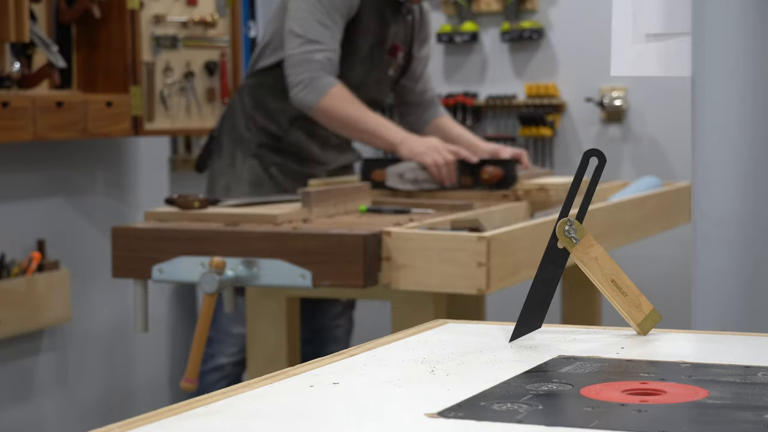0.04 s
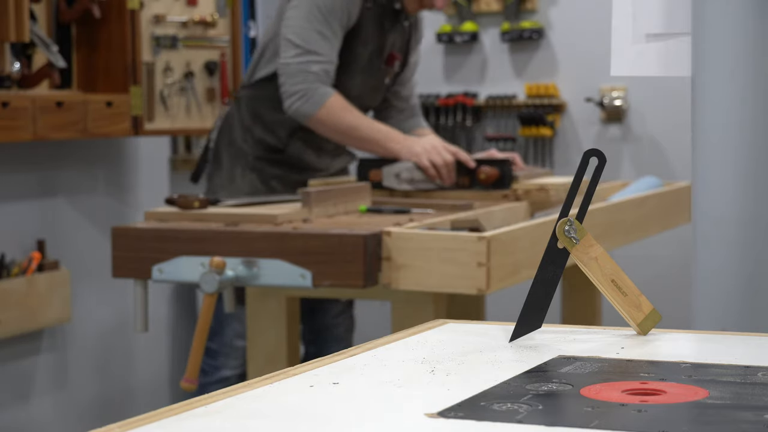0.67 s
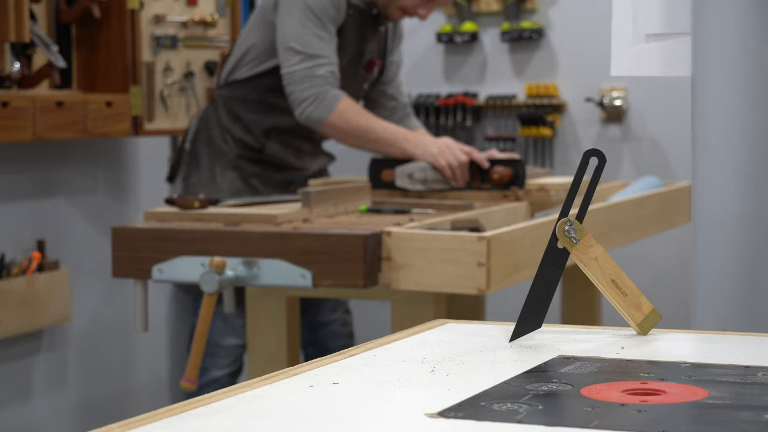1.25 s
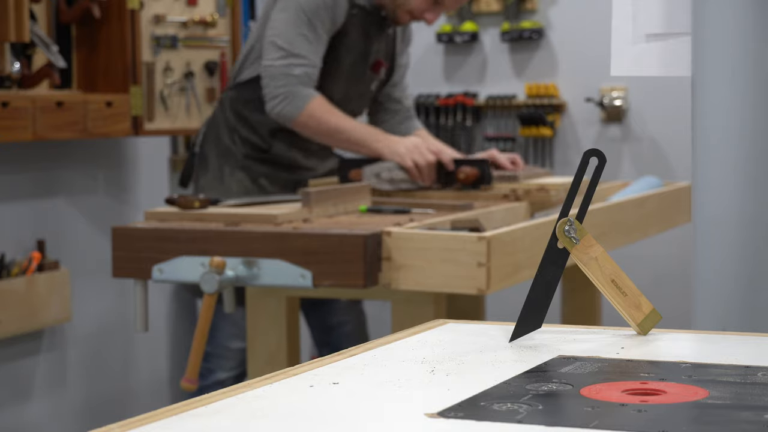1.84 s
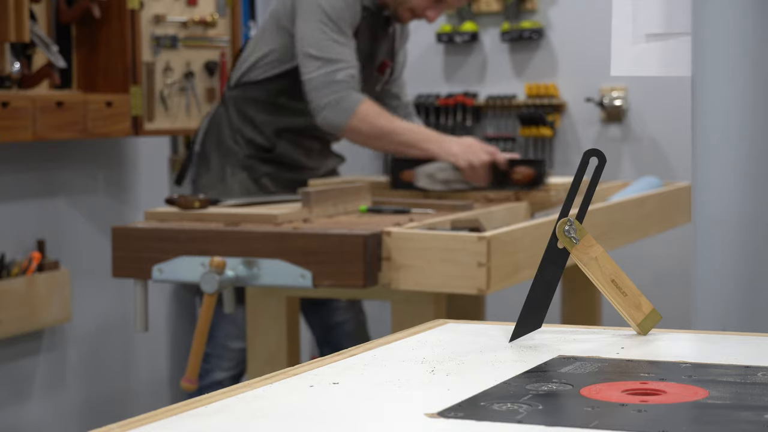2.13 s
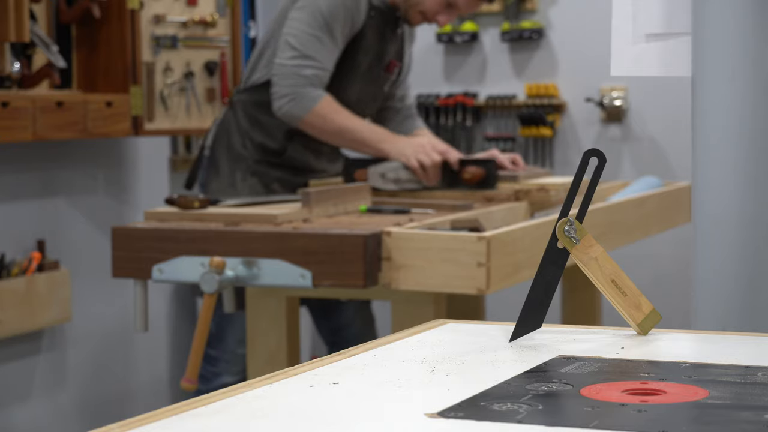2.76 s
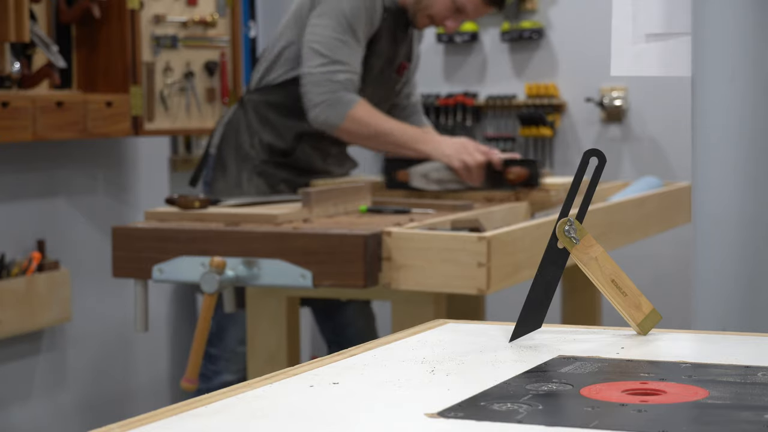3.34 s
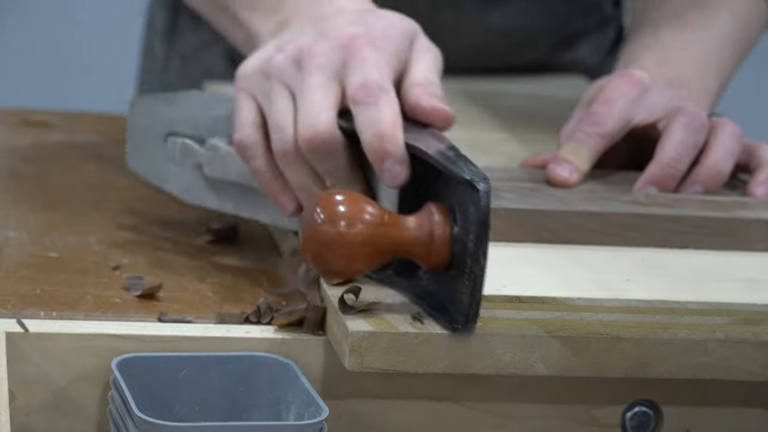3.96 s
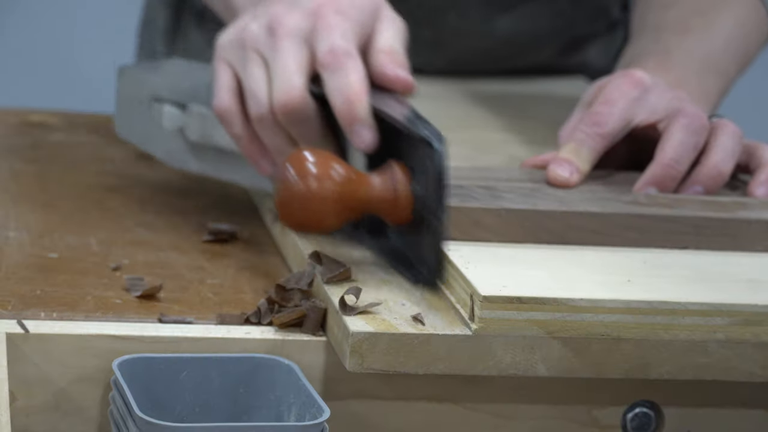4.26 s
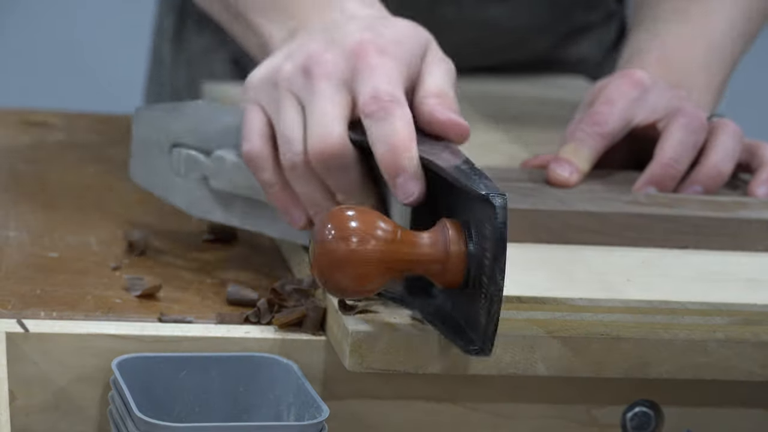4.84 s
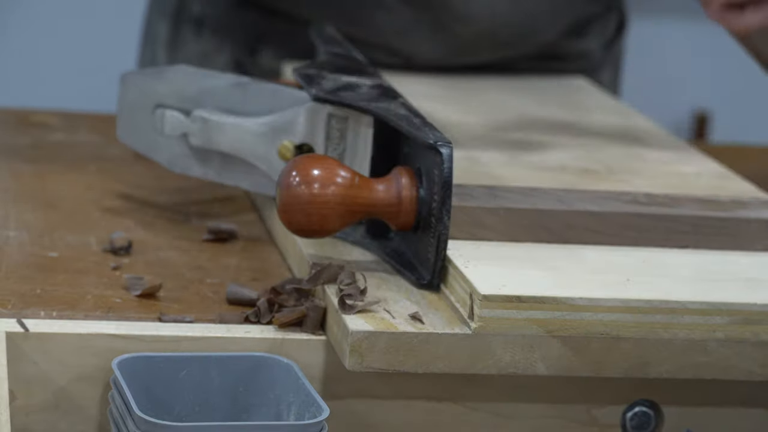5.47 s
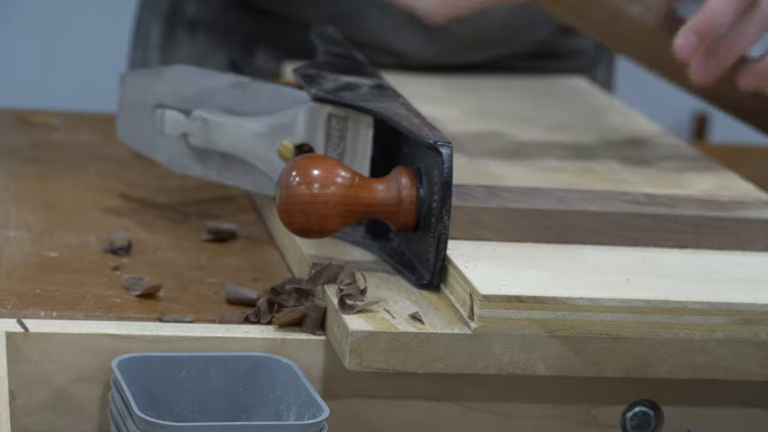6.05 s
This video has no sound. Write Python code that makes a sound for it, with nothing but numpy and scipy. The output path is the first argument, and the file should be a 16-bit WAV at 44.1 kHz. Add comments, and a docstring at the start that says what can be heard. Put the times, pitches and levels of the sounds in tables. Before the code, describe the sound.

An iron hand plane works the end of a board, each push a short rasp ending in a hard knock, each return a lighter clack. The strokes are first heard from across a small, live workshop, after a few faint taps and slides. The microphone then moves close for three louder strokes that thud through the bench. The plane slides to rest, and a single wooden knock and soft hand rubbing follow.

```python
"""Hand plane on a shooting board

An iron plane runs back and forth on its side in a small, live workshop. Its sole rasps on the wood, the blade
bangs into the end grain on each push, and the plane clacks on the way back. Heard from across the room, then
close by; at last the workpiece is knocked as it is set down, then rubbed."""
import sys
import numpy as np
from scipy import signal
from scipy.fft import rfft, irfft
from scipy.io import wavfile

SR = 44100
rng = np.random.default_rng(int(sys.argv[2]) if len(sys.argv) > 2 else 0)


def dump(signal):
    """Clip the signal to [-1, 1] and save it as 16-bit WAV at the path in sys.argv[1]."""
    limited = np.clip(np.atleast_2d(signal).T, -1, 1)
    pcm = np.round(limited * 32767).astype(np.int16)
    wavfile.write(sys.argv[1], SR, pcm)


N = 269010
BLOW_SAMPLES = SR  # one blow with its echoes

# far blows: (time [s], gain [dB], weight [dB], brightness [dB], iron ring [dB], blade pitch [Hz],
# low board ring [dB], high board ring [dB])
FAR_PUSHES = [(0.791, -40.3, 2, -2.5, -4.5, 4420, -17, 2.5), (1.991, -28, 5.5, 3, 1, 4295, -3, -29),
              (2.46, -32, -5, 0.5, -5, 4244, 0.5, -0.5), (2.943, -36.5, 2, -2.5, -3.5, 4295, -3, -27),
              (3.371, -36.5, 0, 0, 0, 4430, -17.5, 2.5)]
FAR_RETURNS = [(1.661, -60.5, 9, 0, -1, 4280, 3, -14.5), (2.2476, -36.5, -4, -0.35, -9, 4270, -5, -13),
               (2.745, -38.5, -2, -.5, -4.5, 4300, -23, -9), (3.224, -36, -9, 0.29, -8, 4350, 1, -0.5)]
# close pushes: (time [s], gain [dB], bench thud [dB])
NEAR_PUSHES = [(3.878, -21.5, 8), (4.3148, -21.5, 6), (4.7575, -21, 0.5)]
# close returns: (time [s], gain [dB], plane ring [dB])
NEAR_RETURNS = [(3.6925, -30, -27), (4.158, -31, -20.5), (4.5873, -31.5, -11)]
# workpiece set down: (time [s], gain [dB], build-up [s])
TAPS = [(0.129, -61, 0.031), (0.239, -45, 0.0091)]
# workpiece slid to the fence: (time [s], gain [dB], length [s])
SWISHES = [(1.135, -60.5, 0.031), (1.28, -50.5, 0.037)]
# bumps as the plane is shifted: (time [s], level [dB])
SHIFTS = [(1.85, -59), (2.206, -55), (3.557, -64), (3.664, -52.5)]
# slow plane slides, hand rubs: (peak time [s], level [dB], rise [s], fall [s])
SLIDES = [(0.08, -66, .3, .3), (0.62, -72.5, 0.33, 0.22), (1.74, -61.5, 0.12, 0.18), (4.92, -70, .1, 0.14),
          (5.1, -59, 0.04, 0.038), (5.2, -66, 0.12, 0.14)]
RUBS = [(5.42, -59, 0.13, .23), (5.93, -64, 0.13, 0.14)]

# modes: (frequency [Hz], width [Hz], gain [dB])
BENCH_MODES = [(155, 18, 2), (215, 16, 4), (274, 14, 9), (329, 14, 8), (392, 20, 6), (482, 20, 2),
               (524, 12, 8), (599, 16, 1), (751, 18, 7)]
BOARD_MODES = [(891, 10, 11), (1214, 4, 15), (1445, 14, 9), (1597, 5.5, 14)]
IRON_MODES = [(1310, 16, 0), (2050, 100, -2), (2698, 24, 14), (2750, 40, 12), (2820, 24, 15), (3440, 80, 2),
              (5050, 40, 3), (5830, 50, 17), (5970, 60, 16), (7460, 60, 5), (9100, 70, 12), (14400, 400, 7)]
BLOW_MODES = [(464, 47, -6.5), (853, 100, -5), (1410, 56, -13.5), (1624, 110, -3), (1880, 124, 2.5),
              (2425, 100, -3), (3454, 115, 6.5), (3670, 58, -14), (5600, 240, -33.5), (6800, 190, -29),
              (10600, 3200, -32.5), (13440, 820, -22)]
PLANE_MODES = [(1882, 30, 3), (1971, 30, 0), (3520, 45, 5), (3610, 60, 2), (5490, 60, 3), (5570, 60, 2),
               (7337, 150, -10)]
WORKPIECE_MODES = [(218, 17, -9), (430, 16, -18), (529, 24, 5.5), (713, 18, -3.5), (893, 41, -10.5),
                   (1409, 40, 6), (1650, 120, -37), (2597, 59, -5.5), (3100, 150, -16.5), (4080, 68, -10),
                   (5740, 49, -11.5), (7240, 100, -19), (9010, 150, -37.5)]
# blade modes, pitched by its seating in the wood: (offset [Hz], width [Hz], gain [dB])
BLADE_MODES = [(-75, 28, 19), (0, 28, 18), (85, 28, 17)]

# edges between the five far-knock bands: (frequency [Hz])
BAND_EDGES_HZ = [350, 700, 1800, 5000]
# knock balance per band, bass first: (gain [dB])
PUSH_BANDS_DB = [-7.5, -2.5, 0.5, -0.5, -14]
RETURN_BANDS_DB = [-12, -5.5, -2, -4, -23]
TAP_BANDS_DB = [-24.5, -15, 0, -12, -41]
# a blow's weight and brightness per band: (share [0-1])
WEIGHT_SHARE = [1, .8, 0, 0, 0]
BRIGHT_SHARE = [0, 0, 0, 1, 0]

# spectra of contacts, bench, friction and air: (frequency [Hz], gain [dB])
WOOD_EQ = [(30, -47), (60, -27), (110, -26), (180, -13.5), (240, -4.5), (450, 3.5), (900, -0.5), (1500, 0),
           (2400, -6), (3300, -5.5), (4400, -16), (6000, -26.5), (10000, -33), (15500, -40)]
CRACK_EQ = [(100, -7), (500, 8), (1500, 2.5), (3500, 13.5), (4400, -19), (7500, -11), (10000, -33.5),
            (14500, -21.5), (16000, -35.5)]
THUD_EQ = [(40, -32.5), (90, -34.5), (140, -0.5), (180, -18), (300, -0.5), (450, 3), (800, -1), (1300, -2),
           (2500, -2.5), (5000, -11), (15000, -36.5)]
BUMP_EQ = [(40, -22), (90, -8.5), (150, -3), (220, -3.5), (400, 0), (700, -3.5), (1200, -15.5),
           (4000, -50.5), (15000, -62)]
NEAR_BOOM_EQ = [(25, -26), (45, -19), (90, -25.5), (140, 10), (200, -11.5), (400, -44), (2000, -70.5)]
FAR_BOOM_EQ = [(25, -21.5), (45, -8.5), (70, -2.5), (135, 2.5), (200, -10.5), (400, -34.5), (2000, -68.5)]
RASP_EQ = [(60, -21), (200, -3.5), (400, -3.5), (900, 4), (1500, -5), (2400, -1), (3500, -0.5),
           (4800, -9.5), (7000, -15), (10000, -23), (15500, -23.5)]
SWISH_EQ = [(100, -20), (300, -15), (450, 10), (800, -0.5), (1600, 2), (2900, 8), (4300, 5.5), (6000, -0.5),
            (10000, -6.5), (15500, -15)]
SKIN_EQ = [(100, 7), (500, -6.5), (1400, -9), (2600, 6.5), (4200, 4), (7000, -5.5), (10000, -9),
           (15500, -10)]
MID_AIR_EQ = [(20, 3.5), (50, 1), (110, -2), (280, 1.5), (550, -6.5), (1200, -7.5), (3300, -20),
              (6000, -16.5), (15500, -20)]
SIDE_AIR_EQ = [(12, -30), (20, 1), (76, 0.5), (245, -29.5), (958, -39), (10800, -37), (15500, -14.5)]
# shop reverberation: (frequency [Hz], T60 [s])
SHOP_T60 = [(100, 0.25), (260, 0.64), (700, 0.48), (1840, 0.42), (4850, 0.43), (12800, 0.23)]


def near_strokes(scrape_s=.012, rock_s=.085, groan_lead_s=.025):
    """Close by: ringing pushes, scraping return clacks; the plane rocks after each."""
    out = np.zeros(N)
    for at_s, db, thud_db in NEAR_PUSHES:
        blow = near_blow(db, scrape_s, thud_db, scrape_db=-38, room_db=-15.16, ring_db=-5)
        add(out, at_s - scrape_s, blow)
        add(out, at_s, boom(NEAR_BOOM_EQ, db=-59.5))
        add(out, at_s + rock_s, bump(db=-55))
    for at_s, db, ring_db in NEAR_RETURNS:
        blow = near_blow(db, scrape_s, thud_db=10, scrape_db=-10, room_db=-16.2, ring_db=ring_db)
        add(out, at_s - scrape_s, blow)
        add(out, at_s + rock_s, bump(db=-52))
        add(out, at_s + rock_s - groan_lead_s, groan())
    return out


def near_blow(db, scrape_s, thud_db, scrape_db, room_db, ring_db):
    """A swelling scrape, then hard contact rings the hand-damped plane; bench and room follow."""
    push = contact(cutoff_hz=3750, crush_db=-10.5, crush_s=.0077)
    crack = level(colour(burst(.015), CRACK_EQ), -8.5, over_s=.02)
    direct = level(resonate(push, BLOW_MODES), 0, over_s=.02) + crack
    ring = level(resonate(push, PLANE_MODES), ring_db, over_s=.02)
    tail = level(in_shop(direct + ring, build_s=.0056), room_db, over_s=.08)
    thud = level(bench_thud(THUD_EQ), thud_db - 24, over_s=.08)
    lead = int(scrape_s * SR)
    ramp = np.interp(np.arange(BLOW_SAMPLES), [0, lead], [.4, 1], right=0)
    rubbing = colour(rng.standard_normal(BLOW_SAMPLES) * ramp, CRACK_EQ)
    scrape = level(resonate(rubbing, BLOW_MODES) + undb(-19) * rubbing, scrape_db, over_s=scrape_s)
    hit = np.pad(direct + tail + thud, (lead, 0))[:BLOW_SAMPLES]
    return undb(db) * (scrape + hit)


def far_strokes(push_build_s=.012, return_build_s=.0095):
    """Across the room: the workpiece is set down, then the plane goes back and forth."""
    out = np.zeros(N)
    for at_s, db, build_s in TAPS:
        bands_db = db + np.array(TAP_BANDS_DB)
        tap = far_knock(bands_db, build_s, iron_db=-3, blade_hz=4310, board_db=[1, 1, -16, -9])
        add(out, at_s, tap)
    kinds = (FAR_PUSHES, PUSH_BANDS_DB, push_build_s), (FAR_RETURNS, RETURN_BANDS_DB, return_build_s)
    for blows, balance_db, build_s in kinds:
        for at_s, db, weight_db, bright_db, iron_db, blade_hz, low_db, high_db in blows:
            tone_db = weight_db * np.array(WEIGHT_SHARE) + bright_db * np.array(BRIGHT_SHARE)
            bands_db = db + tone_db + balance_db
            board_db = [low_db, low_db - 7, high_db, high_db]
            add(out, at_s, far_knock(bands_db, build_s, iron_db, blade_hz, board_db))
    for at_s, *_ in FAR_PUSHES:
        add(out, at_s, boom(FAR_BOOM_EQ, db=-61.5))
    return out


def far_knock(bands_db, build_s, iron_db, blade_hz, board_db, early_s=.0085):
    """A distant blow is mostly room; bench, iron and board ring in it."""
    t = np.arange(BLOW_SAMPLES) / SR
    early_boost = 1 + undb(9) * np.exp(-t / early_s) / 2
    field = colour(shop_response(.84 * build_s) * early_boost, WOOD_EQ)
    push = colour(signal.unit_impulse(BLOW_SAMPLES, int(build_s * SR / 2)), WOOD_EQ)
    drive = undb(-6) * field + undb(-3) * push
    blade_modes = [(blade_hz + offset_hz, width_hz, db) for offset_hz, width_hz, db in BLADE_MODES]
    body = field + undb(-2) * resonate(drive, BENCH_MODES)
    body += undb(iron_db) * resonate(drive, IRON_MODES + blade_modes)
    for mode, db in zip(BOARD_MODES, board_db):
        body += undb(db) * resonate(drive + undb(-4.5) * push, [mode])
    # hardness and place of the blow set the band balance
    spectrum, hz = rfft(body), np.fft.rfftfreq(BLOW_SAMPLES, 1 / SR)
    highpasses = [1] + [1 - 1 / (1 + (hz / edge_hz) ** 10) for edge_hz in BAND_EDGES_HZ] + [0]
    out = 0
    for k, db in enumerate(bands_db):
        band = irfft(spectrum * (highpasses[k] - highpasses[k + 1]), BLOW_SAMPLES)
        out += level(band, db, over_s=.08)
    fade = np.clip(4 * (1 - t), 0, 1) ** 2
    return out * fade


def sole_rasp():
    """Wood fibres catch under the sliding iron and faintly ring it."""
    catches = grains(spread_db=-.5)
    flutter_db = 2 * signal.resample(rng.standard_normal(N // 900), N)
    rasp = colour(catches * undb(flutter_db), RASP_EQ)
    rasp += undb(-13) * resonate(rasp, PLANE_MODES)
    far = run_ups(FAR_PUSHES + FAR_RETURNS, rise_db_per_s=129)
    near = run_ups(NEAR_PUSHES + NEAR_RETURNS, rise_db_per_s=62.5)
    return level(rasp, 0) * np.max([far, near, swells(SLIDES)], axis=0)


def run_ups(blows, rise_db_per_s, fall_db_per_s=47.5):
    """Rasp gain: the plane speeds up to each blow, then coasts; harder blows rasp louder."""
    t, gain = np.arange(N) / SR, 0
    for at_s, blow_db, *_ in blows:
        peak_db = -55.5 + .34 * (blow_db + 28)
        drop_db = np.abs(t - at_s) * np.where(t < at_s, rise_db_per_s, fall_db_per_s)
        gain = np.maximum(gain, undb(peak_db - drop_db))
    return gain


def groan(from_hz=480, to_hz=258, width_hz=110, length_s=.08):
    """The sole sticks and slips unevenly, ever slower as the plane stops."""
    n = int(length_s * SR)
    phase = 2 * np.pi * np.cumsum(np.linspace(from_hz, to_hz, n)) / SR
    lowpass = signal.butter(2, width_hz / 2, fs=SR, output="sos")
    uneven = signal.sosfilt(lowpass, rng.standard_normal((2, BLOW_SAMPLES)))[:, -n:]
    tone = uneven[0] * np.cos(phase) + uneven[1] * np.sin(phase)
    return level(tone * np.hanning(n), db=-57)


def workpiece_set_down(at_s=5.2575, gain_db=-36.5):
    """The loose wood knocks once as it is set down; the hand rubs the same modes."""
    out = np.zeros(N)
    tap = contact(cutoff_hz=4130, crush_db=-20.5, crush_s=.002)
    knock = level(resonate(tap, WORKPIECE_MODES), 0, over_s=.02)
    knock += level(colour(burst(.012), WOOD_EQ), -13, over_s=.02)
    thud = level(bench_thud(BUMP_EQ), -16, over_s=.08)
    add(out, at_s, undb(gain_db) * (knock + undb(-6.5) * in_shop(knock) + thud))
    skin = colour(grains(spread_db=3), SKIN_EQ)
    rub = resonate(skin, WORKPIECE_MODES) + undb(-25) * skin
    return out + level(rub, 0) * swells(RUBS)


def swish(db, length_s):
    """A quick, distant slide of wood on wood."""
    t = np.arange(BLOW_SAMPLES) / SR
    slide = rng.standard_normal(BLOW_SAMPLES) * np.exp(-2 * t / length_s)
    return level(colour(in_shop(slide, build_s=.0091), SWISH_EQ), db - 4, over_s=.08)


def bump(db):
    """The plane rocks dully on the board."""
    return level(bench_thud(BUMP_EQ), db, over_s=.05)


def boom(eq, db):
    """A heavy push shakes the whole bench."""
    return level(colour(in_shop(burst(.004)), eq), db, over_s=.08)


def bench_thud(eq):
    """The heavy bench rings into the room."""
    field = colour(shop_response(build_s=.006), eq)
    return field + undb(-9.5) * resonate(field, BENCH_MODES)


def contact(cutoff_hz, crush_db, crush_s):
    """Wood gives under a blow: a rounded pulse plus crushing fibres."""
    lowpass = signal.butter(10, cutoff_hz, fs=SR, output="sos")
    pulse = signal.sosfilt(lowpass, signal.unit_impulse(BLOW_SAMPLES) + 1e-18)
    return pulse + undb(crush_db) * burst(crush_s)


def burst(decay_s, attack_s=.00035):
    """Crackle of crushing fibres; unit energy."""
    t = np.arange(BLOW_SAMPLES) / SR
    x = rng.standard_normal(BLOW_SAMPLES) * np.exp(-t / decay_s) * (1 - np.exp(-t / attack_s))
    return x / np.sqrt(np.sum(x ** 2))


def grains(spread_db):
    """Dense tiny contacts of unequal size."""
    noise, size = rng.standard_normal((2, N))
    return noise * undb(spread_db * size)


def swells(moves, edge_db=-10):
    """Gain of smooth hand movements that speed up and slow down."""
    t, power = np.arange(N) / SR, 0
    for at_s, db, rise_s, fall_s in moves:
        away = (t - at_s) / np.where(t < at_s, rise_s, fall_s)
        power += undb(db + edge_db * away ** 2) ** 2
    return np.sqrt(power)


def shop_response(build_s):
    """Room impulse response: echoes build, then die, low mids last; unit energy."""
    t, hz = np.arange(BLOW_SAMPLES) / SR, np.fft.rfftfreq(BLOW_SAMPLES, 1 / SR)
    noise, out = rfft(rng.standard_normal(BLOW_SAMPLES)), 0
    centres_hz, t60s = np.transpose(SHOP_T60)
    for share, t60_s in zip(np.eye(len(centres_hz)), t60s):
        band = irfft(noise * log_interp(np.c_[centres_hz, share], hz), BLOW_SAMPLES)
        out += band * undb(-60 * t / t60_s)
    out *= 1 - np.exp(-t / build_s)
    return out / np.sqrt(np.sum(out ** 2))


def in_shop(x, build_s=.0053):
    """Reverberation of x."""
    return signal.fftconvolve(x, shop_response(build_s))[:len(x)]


def room_air():
    """Quiet air; some rumble and hiss differ left and right."""
    mid = level(colour(rng.standard_normal(N), MID_AIR_EQ), -74)
    side = level(colour(rng.standard_normal(N), SIDE_AIR_EQ), -80.5)
    hiss = undb(-84.5) * rng.standard_normal((2, N))
    return mid + side * np.array([[1], [-1]]) + hiss


def resonate(x, modes):
    """Drive damped modes."""
    return sum(undb(db) * signal.lfilter(*signal.iirpeak(hz, hz / width_hz, SR), x + 1e-18)
               for hz, width_hz, db in modes)


def colour(x, eq, size=2048):
    """Minimum-phase filter with spectrum eq."""
    gain = undb(log_interp(eq, np.fft.rfftfreq(size, 1 / SR)))
    cepstrum = irfft(np.log(gain))
    cepstrum[1:size // 2] *= 2
    cepstrum[size // 2 + 1:] = 0
    response = irfft(np.exp(rfft(cepstrum)))
    return signal.fftconvolve(x, response)[:len(x)]


def log_interp(points, hz):
    """Interpolate on a log-frequency axis."""
    points_hz, values = np.transpose(points)
    return np.interp(np.log(hz + 1), np.log(points_hz), values)


def undb(db):
    """Decibels to gain."""
    return 10 ** (np.asarray(db) / 20)


def level(x, db, over_s=None):
    """Scale x to an rms level, over its first over_s if given."""
    head = x if over_s is None else x[:round(over_s * SR)]
    return x * undb(db) / np.sqrt(np.mean(head ** 2) + 1e-24)


def add(track, at_s, x):
    """Mix x in at at_s."""
    start = int(at_s * SR)
    track[start:start + len(x)] += x[:N - start]


def scene():
    """Centred work over stereo air."""
    work = sole_rasp() + workpiece_set_down() + far_strokes() + near_strokes()
    for at_s, db in SHIFTS:
        add(work, at_s, bump(db))
    for at_s, db, length_s in SWISHES:
        add(work, at_s, swish(db, length_s))
    return work + room_air()


def record(dry):
    """Steep treble cut."""
    cutoff_hz = 15900
    return signal.sosfilt(signal.ellip(10, .2, 70, cutoff_hz, fs=SR, output="sos"), dry)


dry = scene()
out = record(dry)
dump(out)
```